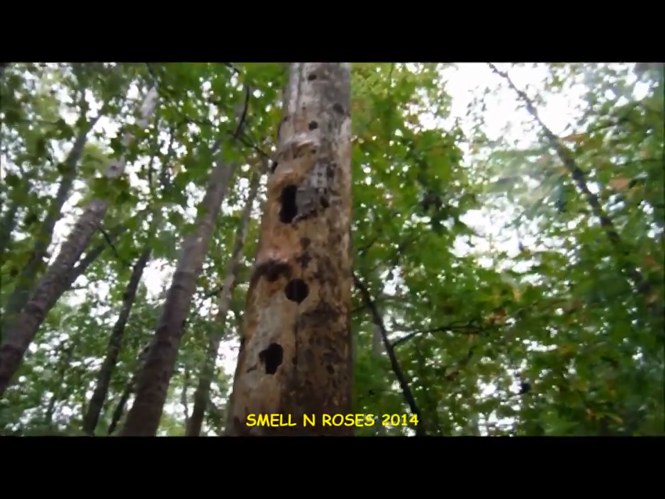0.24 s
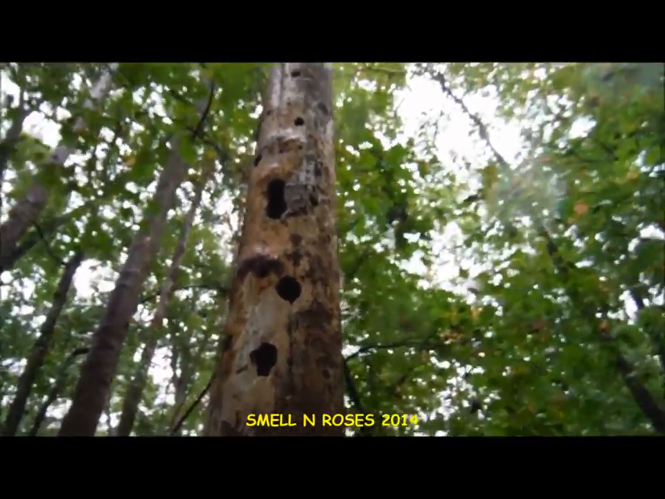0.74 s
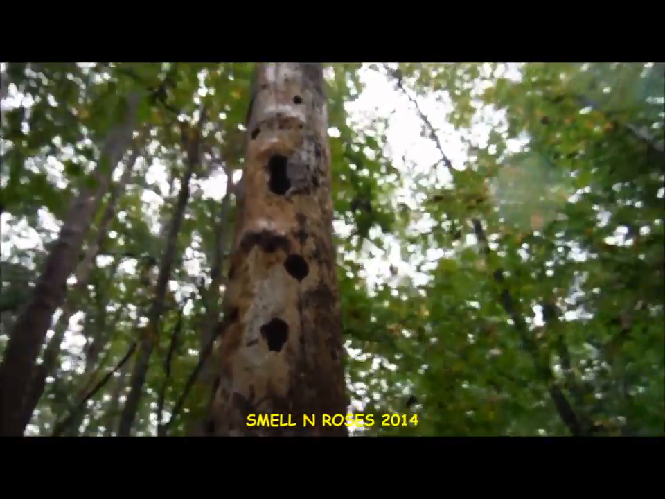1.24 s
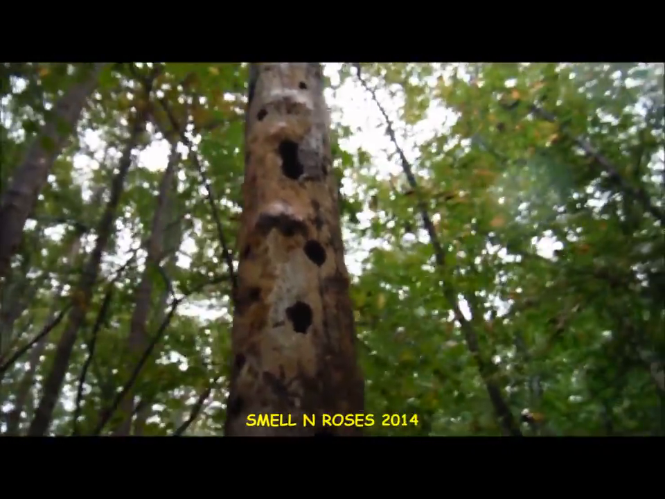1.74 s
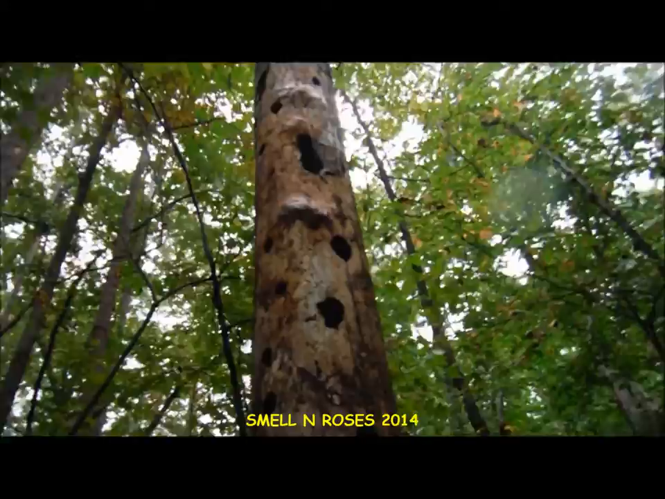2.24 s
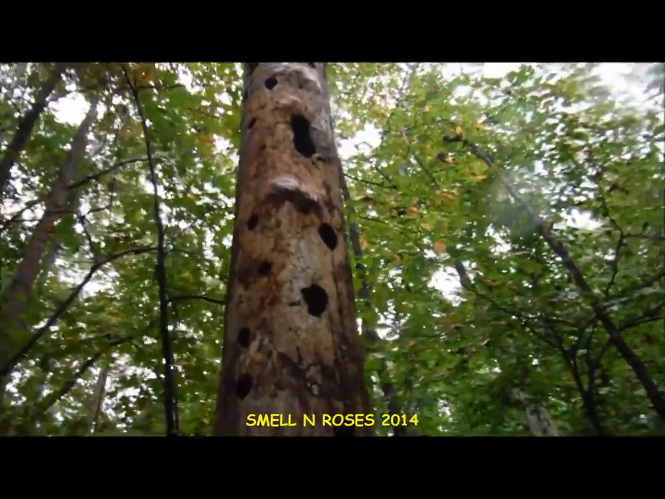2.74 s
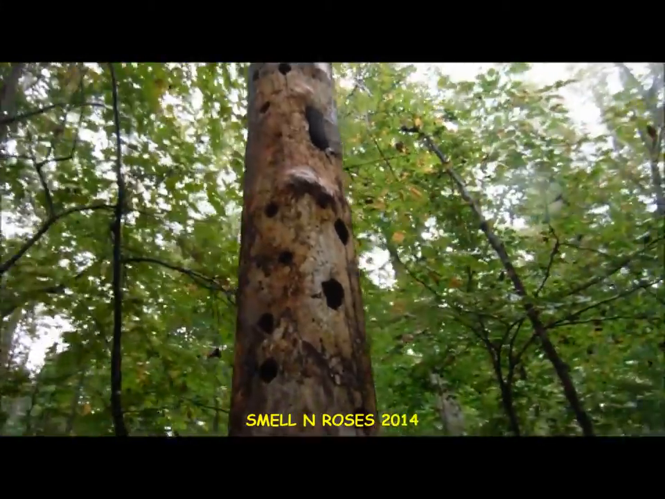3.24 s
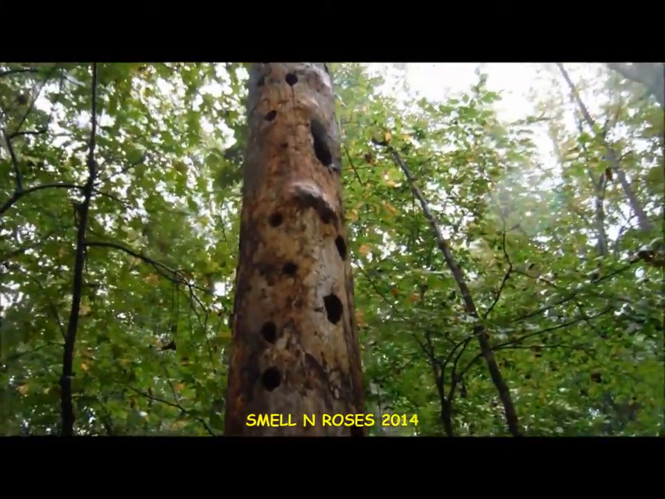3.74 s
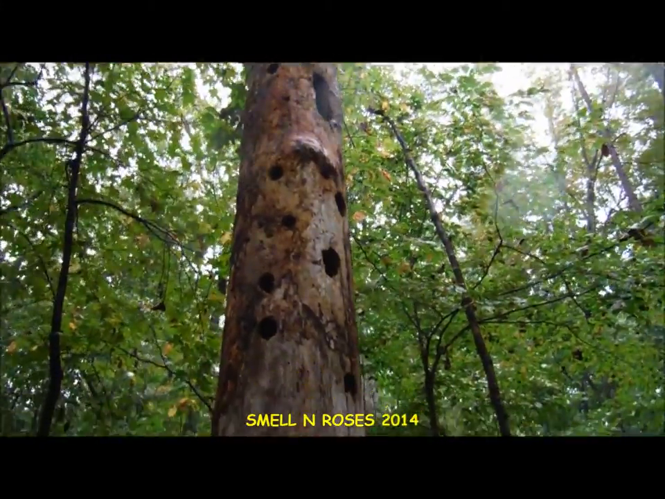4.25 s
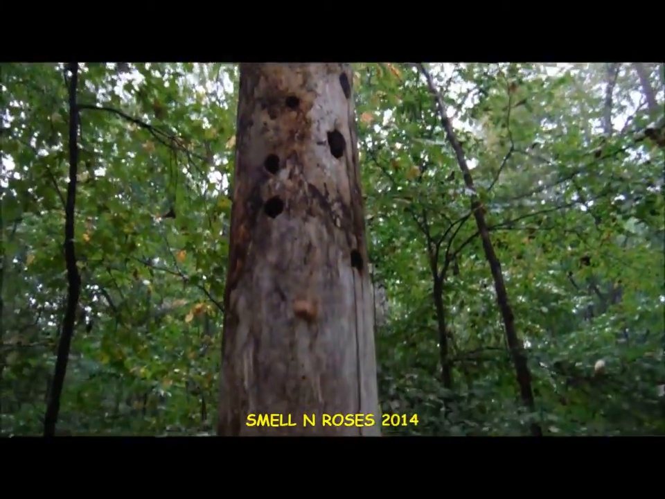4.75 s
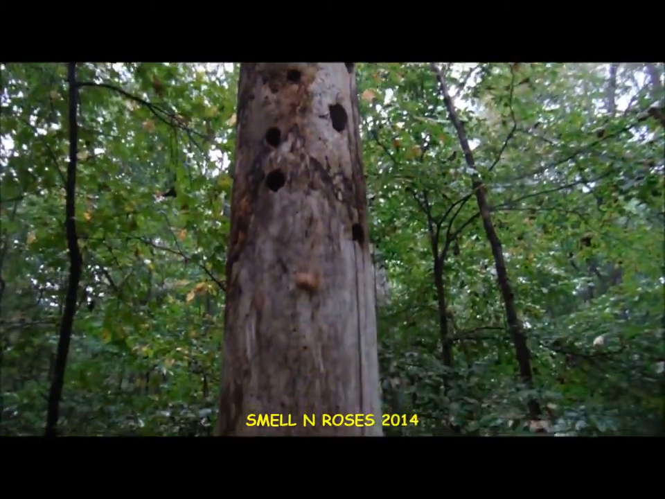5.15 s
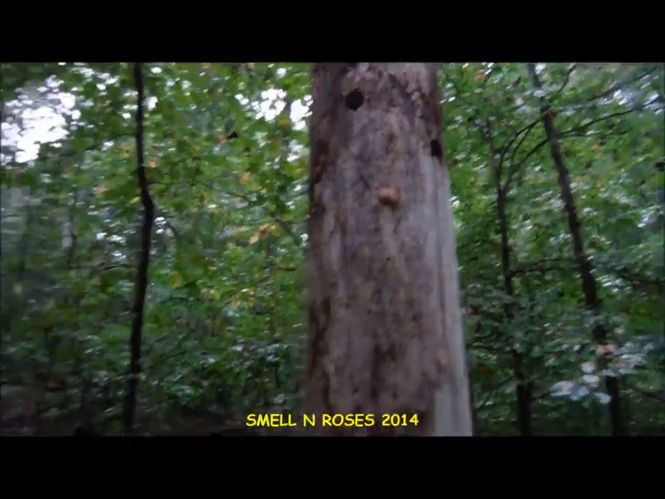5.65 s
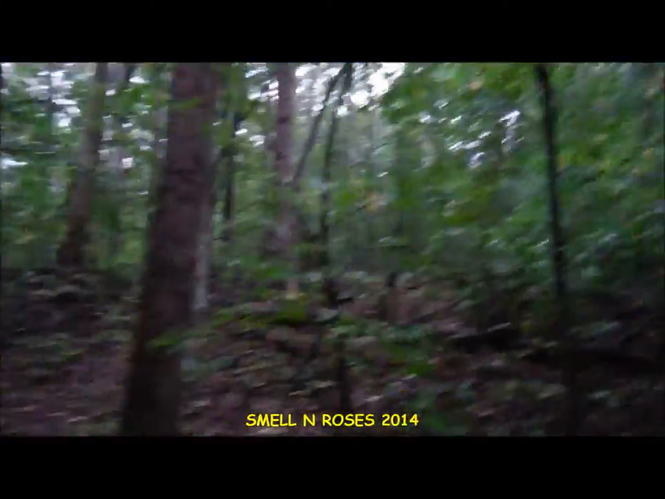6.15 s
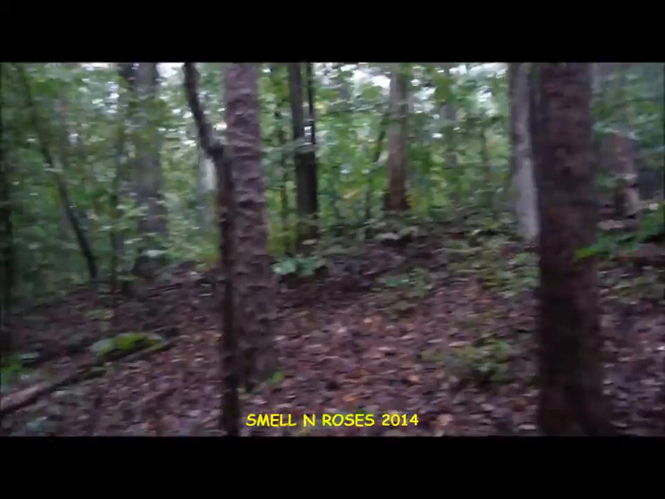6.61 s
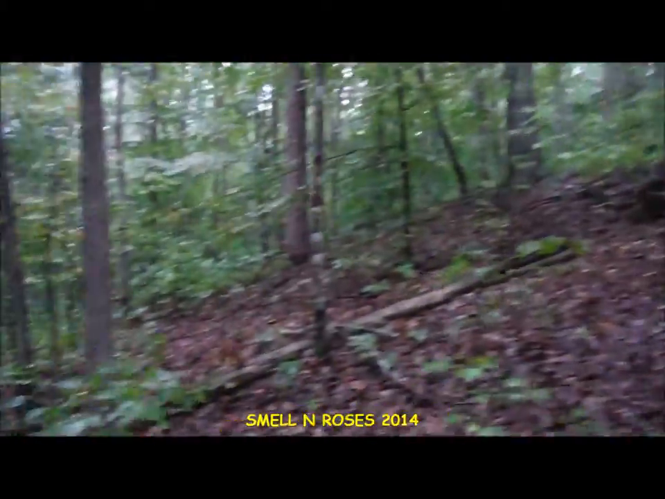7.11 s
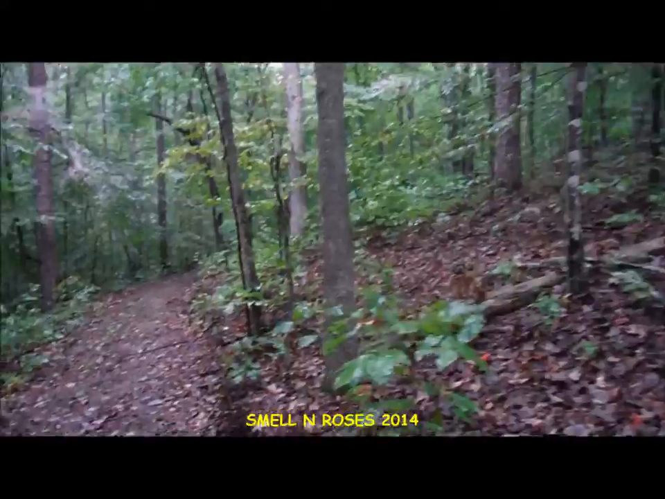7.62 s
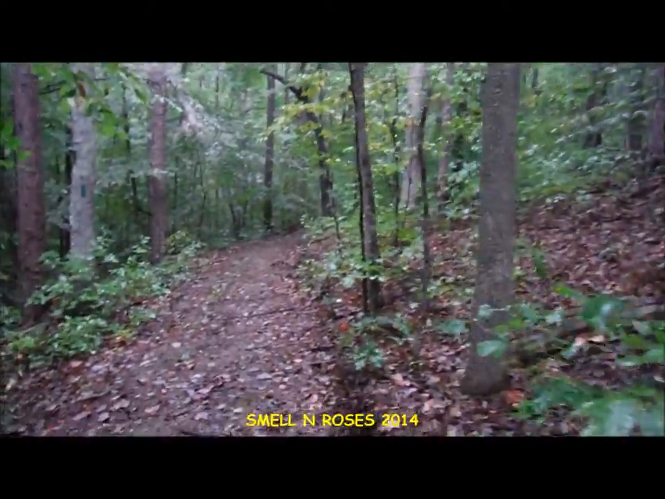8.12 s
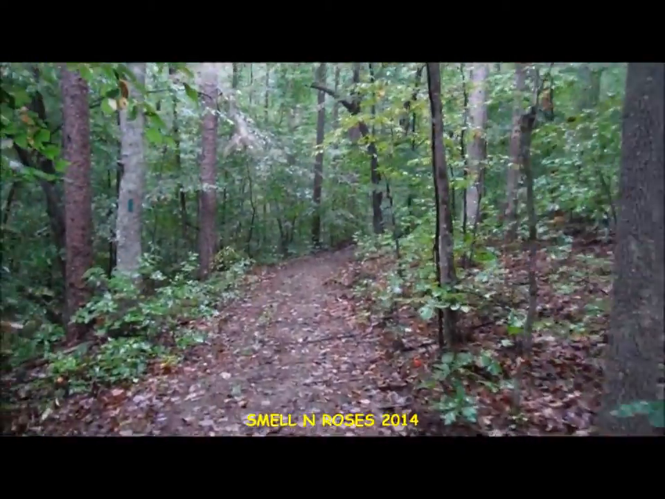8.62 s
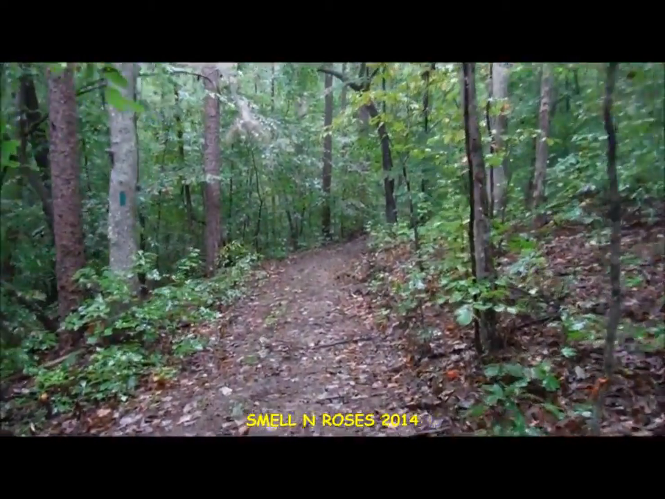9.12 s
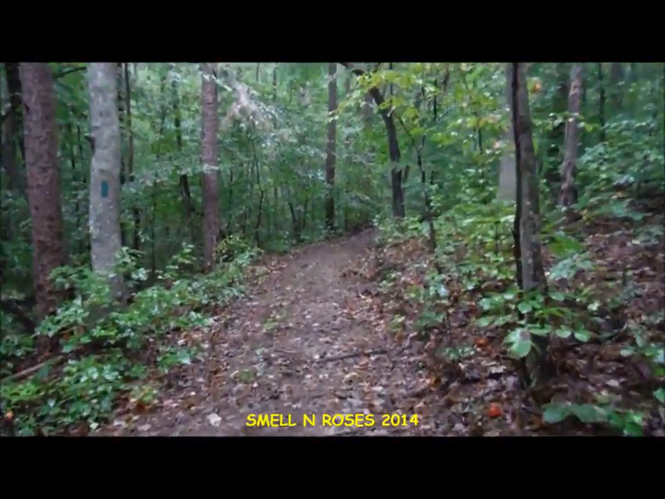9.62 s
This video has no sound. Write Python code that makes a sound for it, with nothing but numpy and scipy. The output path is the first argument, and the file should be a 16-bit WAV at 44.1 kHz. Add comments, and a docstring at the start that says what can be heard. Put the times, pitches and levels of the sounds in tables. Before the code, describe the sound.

Under the trees, a hand-held microphone picks up the constant hiss and patter of rain on foliage. A loud drop smacks the camera near the start, followed by a few sharp splats right beside it. From about six seconds on, ticks of drops on close leaves and the forest floor come more often, with occasional small knocks on the camera. A very faint handling rumble lies beneath the rain.

```python
"""Steady rain in a leafy forest

One mono microphone on a small hand-held camera, under the trees. Far drops merge into a wash, nearer
ones patter on leaves, and those within arm's reach tick sharply; a few tap and knock on the camera.
The loudest hits overload the recorder and duck its gain. The grip rumbles; the electronics whine faintly."""
import sys
import numpy as np
from scipy import signal
from scipy.fft import rfft, irfft, next_fast_len
from scipy.io import wavfile

SR = 44100
rng = np.random.default_rng(int(sys.argv[2]) if len(sys.argv) > 2 else 0)


def wav_out(sig):
    """Save sig, one row per channel (or a flat mono array), as 16-bit PCM at SR to the path in sys.argv[1]."""
    wavfile.write(sys.argv[1], SR, np.round(np.clip(np.atleast_2d(sig).T, -1, 1) * 32767).astype(np.int16))


N = 435266
TIME = np.arange(N) / SR

# colour of the rain on the far canopy: frequency_hz, level_db
CANOPY_SPECTRUM = [(59, -48), (100, -18.5), (211, -11), (414, -8), (456, -7.5), (680, -5.5), (1010, -4),
                   (1260, -1.5), (1640, -2.5), (2200, -0.5), (2700, -7.5), (3510, -39), (5940, -120)]
# colour of the rain on nearer leaves: frequency_hz, level_db
HISS_SPECTRUM = [(1590, -41), (2700, -9.5), (2990, -7), (3700, -2), (4280, -6), (4810, -0.5), (5030, 0),
                 (6310, -4), (7680, -3.5), (8260, -6), (9430, -18), (10500, -20), (12400, -32),
                 (14800, -37), (15500, -40.5)]
# drips from the low plants, thicker near the ground: time_s, drips_per_s, level_db
DRIP_CURVE = [(0, 16, -22), (5.6, 14.5, -25), (6.5, 36, -24.5), (8.3, 52, -16), (9.87, 43.6, -18)]
# resonances of the microphone's opening: centre_hz, width_hz, boost_db
PORT_RESONANCES = [(1700, 910, 2), (2780, 790, 1), (5000, 750, 2)]
# swells of rumble as the hands shift their grip: centre_s, level_db
GRIP_SWELLS = [(0.27, -50), (0.6, -46), (1.25, -50), (1.76, -48), (4.64, -54), (8.69, -46), (9.3, -50),
               (9.8, -43)]
# bending modes of a struck surface: pitch_ratio, level_db
SURFACE_MODES = [(0.783, -6.5), (0.999, 0), (1.218, -4.5)]
# drops on the camera's thin shell: start_s, level_db
SHELL_TAPS = [(0.2276, -4.5), (0.5403, 13.5), (0.606, -1.5), (1.8172, -3), (5.65, -9), (8.4573, -7),
              (9.407, -10), (9.782, -11)]
# dull knocks on the camera body: start_s, level_db, pitch_hz
BODY_KNOCKS = [(0.5394, -2, 533), (0.6068, -15.5, 210), (1.074, -15, 225), (6.6967, -13.5, 350),
               (8.6770, -28, 130), (8.8547, -16, 450), (9.76, -17.5, 260)]
# drops that shatter right by the microphone: start_s, level_db, pitch_hz
NEAR_SPLATS = [(0.5398, 14.5, 5740), (1.0742, -2, 6400), (1.8166, 6, 2920), (2.3663, -4, 4700),
               (2.5695, -2, 5850), (3.8556, 9, 6800), (6.6969, -4, 7950), (6.9694, -2, 7750)]
# drops on leaves and litter within arm's reach: start_s, level_db, pitch_hz
CLOSE_DROPS = [(3.898, -11, 7470), (3.9087, -8, 5020), (4.142, -6.5, 6420), (4.2745, -2, 5870),
               (5.2962, -8, 5080), (6.008, -2, 4750), (6.1375, -1.5, 4940), (6.3825, -2, 4730),
               (6.3962, -8, 3600), (6.4962, -5, 6360), (6.583, -7, 5280), (6.6357, -6, 5540),
               (6.644, -5, 7350), (7.2486, -5.5, 5000), (7.355, -4, 6010), (7.8092, -7, 7800),
               (8.0908, 1.5, 5000), (8.2151, -4.5, 5380), (8.405, -10, 3900), (8.456, -1.5, 5650),
               (8.5652, -10, 4130), (8.6955, -2.5, 6270), (8.7592, 0.5, 4540), (9.0453, -8, 4970),
               (9.174, -8, 6610), (9.4068, -4, 5250), (9.7595, -7, 6900)]

CANOPY_DB, HISS_DB = -27.5, -22.55
HISS_FADE_DB_PER_S = 0.0671   # the leaves overhead grow a little fainter as the microphone tilts down
CROSSOVER_HZ = 2700   # canopy below, leaf hiss above
SOFTNESS_HZ = 8970   # wet contact has no hard edge
SPRAY_T60_RATIO = 1.43   # a close splash outlasts the leaf's ring


def from_db(db):
    """Decibels to gain."""
    return 10 ** (np.asarray(db) / 20)


def rms_one(x):
    """Scale to unit power."""
    return x / np.sqrt(np.mean(x ** 2) + 1e-20)


def cut(x, hz, kind, order=2):
    """Causal low- or high-pass."""
    return signal.sosfilt(signal.butter(order, hz, kind, fs=SR, output="sos"), x + 1e-18)


def add(out, start_s, sound):
    """Mix a sound in at a time."""
    i = int(start_s * SR)
    out[i:i + len(sound)] += sound[:N - i]


def drift(rate_hz):
    """Slow random wander of unit power."""
    step, settle = 40, 2000
    pole = np.exp(-2 * np.pi * rate_hz * step / SR)
    noise = rng.standard_normal(N // step + settle + 2)
    slow = signal.lfilter([1], [1, -2 * pole, pole * pole], noise)[settle:]
    return np.interp(np.arange(N) / step, np.arange(len(slow)), rms_one(slow))


def ring(clicks, hz, t60):
    """Each click starts a sine that dies by 60 dB in t60 seconds."""
    decay, angle = from_db(-60 / (t60 * SR)), 2 * np.pi * hz / SR
    return signal.lfilter([0, np.sin(angle)], [1, -2 * decay * np.cos(angle), decay ** 2], clicks + 1e-18)


def impacts(per_s, spread_db, most_db):
    """Random impact samples and sizes: many small, few large."""
    at = np.flatnonzero(rng.random(N) < per_s / SR)
    size_db = np.minimum(spread_db * rng.exponential(1, len(at)), most_db)
    return at, from_db(size_db) * rng.choice([-1, 1], len(at))


def leaves(at, sizes, low_hz, high_hz, count, t60):
    """Each impact lands on one of several leaves, each ringing briefly at its own pitch."""
    leaf = rng.integers(0, count, len(at))
    return sum(ring(np.bincount(at[leaf == k], sizes[leaf == k], N), hz, t60)
               for k, hz in enumerate(np.linspace(low_hz, high_hz, count)))


def coloured(x, spectrum, below):
    """Shape a sound by a spectrum, on one side of the crossover; unit power."""
    size = next_fast_len(N)
    hz = np.maximum(np.arange(size // 2 + 1) * SR / size, 1)
    points_hz, level_db = np.transpose(spectrum)
    gain = from_db(np.interp(np.log(hz), np.log(points_hz), level_db))
    low_share = 1 / (1 + (hz / CROSSOVER_HZ) ** 40)
    gain *= np.sqrt(low_share if below else 1 - low_share)
    return rms_one(irfft(rfft(x, size) * gain, size)[:N])


def canopy():
    """Far rain on broad leaves: soft pats in a smooth murmur."""
    at, sizes = impacts(per_s=500, spread_db=3, most_db=8.5)
    pats = leaves(at, sizes, low_hz=292, high_hz=3030, count=14, t60=0.011)
    wash = rng.standard_normal(N) + from_db(-14.5) * rms_one(pats)
    return coloured(wash, CANOPY_SPECTRUM, below=True) * from_db(0.28 * drift(rate_hz=3.5))


def leaf_hiss():
    """Dense fine splashes on the nearer leaves, over their blurred sum."""
    at, sizes = impacts(per_s=1800, spread_db=3, most_db=9.5)
    splashes = leaves(at, sizes, low_hz=2550, high_hz=14100, count=22, t60=0.0025)
    wash = rng.standard_normal(N) + from_db(-8) * rms_one(splashes)
    return coloured(wash, HISS_SPECTRUM, below=False) * from_db(0.2 * drift(rate_hz=9))


def mic_port(x):
    """The opening in front of the microphone resonates, colouring direct sounds."""
    for hz, width_hz, boost_db in PORT_RESONANCES:
        band = signal.lfilter(*signal.iirpeak(hz, hz / width_hz, fs=SR), x + 1e-18)
        x = x + (from_db(boost_db) - 1) * band
    return x


def drips():
    """Small ticks from plants a few steps away, and now and then a lower pat on a broad leaf."""
    time_s, per_s, level_db = np.transpose(DRIP_CURVE)
    at, sizes = impacts(np.interp(TIME, time_s, per_s), spread_db=3.5, most_db=8)
    sizes *= from_db(np.interp(TIME[at], time_s, level_db))
    ticks = leaves(at, sizes, low_hz=3400, high_hz=8720, count=12, t60=0.0063)
    at, sizes = impacts(per_s=5, spread_db=3.5, most_db=6)
    pats = leaves(at, sizes, low_hz=1200, high_hz=2570, count=6, t60=0.0049)
    return mic_port(cut(ticks + from_db(-19) * pats, SOFTNESS_HZ, "low", order=4))


def handling(rest_db=-52.5, half_width_s=0.084):
    """Faint rumble reaches the microphone through the grip, swelling whenever the hands shift."""
    swell_power = sum(from_db(level_db) ** 2 * np.exp(-((TIME - centre_s) / half_width_s) ** 2)
                      for centre_s, level_db in GRIP_SWELLS)
    envelope = np.sqrt(from_db(rest_db) ** 2 + swell_power)
    noise = rng.standard_normal(N)
    rumble = rms_one(cut(noise, 94, "low", order=3))
    boom = from_db(-2) * rms_one(ring(noise, hz=32.2, t60=0.11))
    return envelope * rms_one(cut(rumble + boom, 21, "high"))


def whine(pitch_hz=15735, throbs_per_s=10.9):
    """The camera's electronics: a thin throbbing tone over a faint high hiss."""
    throb = np.abs(np.sin(np.pi * throbs_per_s * TIME)) ** 0.6
    hiss = rms_one(ring(rng.standard_normal(N), hz=15000, t60=0.005))
    return from_db(-57) * throb * np.sin(2 * np.pi * pitch_hz * TIME) + from_db(-60) * hiss


def strike(hz, t60, spray_db, spray_hz, spray_t60):
    """One drop lands: the surface rings while the water bursts into a band of noise; peak 1."""
    t = TIME[:SR // 10]
    low_hz, high_hz = spray_hz
    modes = sum(from_db(db) * np.sin(2 * np.pi * hz * ratio * t) for ratio, db in SURFACE_MODES)
    noise = rng.standard_normal(len(t))
    spray = rms_one(cut(cut(noise, low_hz, "high"), high_hz, "low"))
    blow = modes * from_db(-60 * t / t60) + spray * from_db(spray_db - 60 * t / spray_t60)
    blow = cut(blow, SOFTNESS_HZ, "low", order=6)
    blow = cut(blow, low_hz, "high", order=3)   # a small surface radiates no bass
    return blow / np.abs(blow).max()


def shell_taps():
    """Drops set the camera's thin shell ringing, hollow and always at one pitch."""
    out = np.zeros(N)
    for start_s, level_db in SHELL_TAPS:
        tap = strike(hz=1770, t60=0.012, spray_db=-5, spray_hz=(1440, 3900), spray_t60=0.015)
        add(out, start_s, from_db(level_db) * tap)
    return mic_port(out)


def body_knocks(decay_cycles=7.6):
    """Low, quickly damped thuds carried to the microphone through the housing."""
    out = np.zeros(N)
    for start_s, level_db, hz in BODY_KNOCKS:
        t60 = decay_cycles / hz
        thud = strike(hz, t60, spray_db=4.5, spray_hz=(0.42 * hz, 2.6 * hz), spray_t60=t60)
        add(out, start_s, from_db(level_db) * thud)
    return out


def snap(t60):
    """The brief bright snap of a drop shattering."""
    t = TIME[:SR // 100]
    burst = rng.standard_normal(len(t)) * from_db(-60 * t / t60)
    return cut(cut(burst, 8050, "high", order=3), 11500, "low", order=4)


def splats(t60=0.0062):
    """Drops burst right by the microphone: a ring, a broad spray and a snap."""
    out = np.zeros(N)
    for start_s, level_db, hz in NEAR_SPLATS:
        burst = strike(hz, t60, spray_db=-3.5, spray_hz=(0.43 * hz, 1.18 * hz),
                       spray_t60=t60 * SPRAY_T60_RATIO)
        snap_db = -10 + 1.86 * level_db   # the snap grows faster than the ring
        add(out, start_s, from_db(level_db) * burst)
        add(out, start_s, from_db(snap_db) * snap(t60=0.0027))
    return mic_port(out)


def close_drops():
    """Ticks on leaves within arm's reach; small stiff leaves ring shorter and spray brighter."""
    out = np.zeros(N)
    for start_s, level_db, hz in CLOSE_DROPS:
        t60 = 0.0053 * np.sqrt(5000 / hz) * np.exp(-0.08 * level_db)   # louder ticks die sooner
        tick = strike(hz, t60, spray_db=-4.5, spray_hz=(0.77 * hz, hz), spray_t60=t60 * SPRAY_T60_RATIO)
        snap_db = -24 - level_db   # fainter ticks carry more snap
        add(out, start_s, from_db(level_db) * tick)
        add(out, start_s, from_db(snap_db) * snap(t60=0.0043))
    return mic_port(out)


def scene():
    """Far, near and on-camera sounds meet at one microphone, fed to both channels."""
    rain = from_db(CANOPY_DB) * canopy() + from_db(HISS_DB - HISS_FADE_DB_PER_S * TIME) * leaf_hiss()
    mono = rain + drips() + close_drops() + splats() + shell_taps() + body_knocks() + handling() + whine()
    return np.array([mono, mono])


def gain_control(x, threshold_db, slope, most_db, release_db_per_s, sense_hz, attack_s):
    """Treble peaks pull the recorder's gain down a little just after they pass; it then creeps back."""
    level_db = 20 * np.log10(np.abs(cut(x, sense_hz, "high")) + 1e-9)
    duck_db = np.clip(slope * (level_db - threshold_db), 0, most_db)
    release_db = release_db_per_s * TIME
    held_db = np.maximum.accumulate(duck_db + release_db) - release_db
    pole = np.exp(-1 / (attack_s * SR))
    return from_db(-signal.lfilter([1 - pole], [1, -pole], held_db))


def record(dry):
    """The camera's recorder: gain control, hard overload and a steep cut of the top."""
    gain = gain_control(dry[0], threshold_db=-12, slope=0.24, most_db=2.4,
                        release_db_per_s=15, sense_hz=7500, attack_s=0.005)
    clipped = np.clip(dry * gain, -1, 1)
    top_cut = signal.ellip(10, 0.1, 70, 15950, fs=SR, output="sos")
    return signal.sosfilt(top_cut, clipped)


dry = scene()
out = record(dry)
wav_out(out)
```